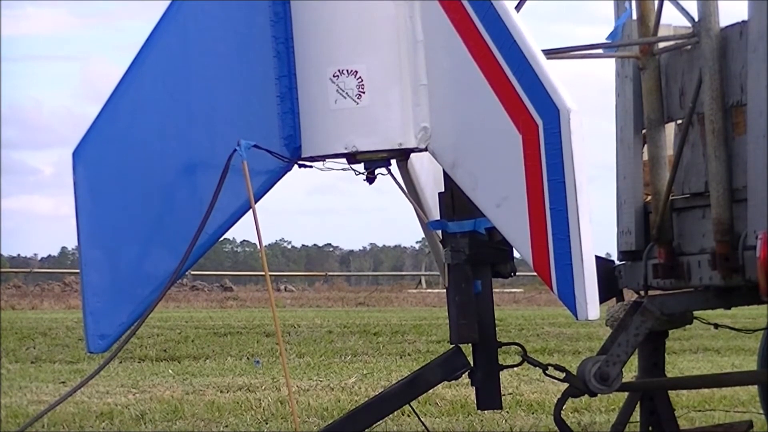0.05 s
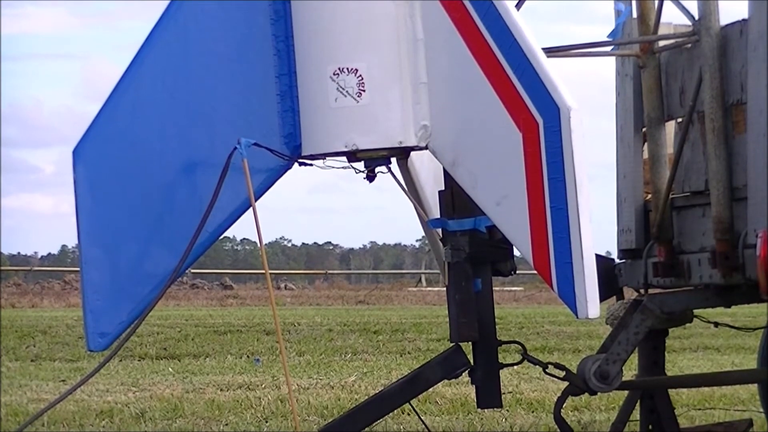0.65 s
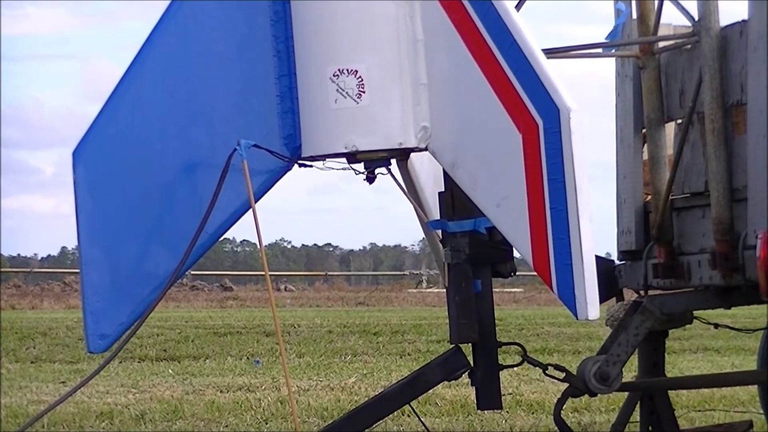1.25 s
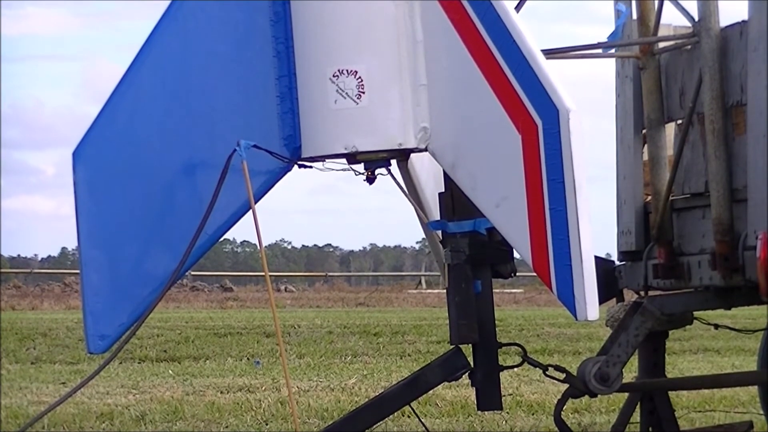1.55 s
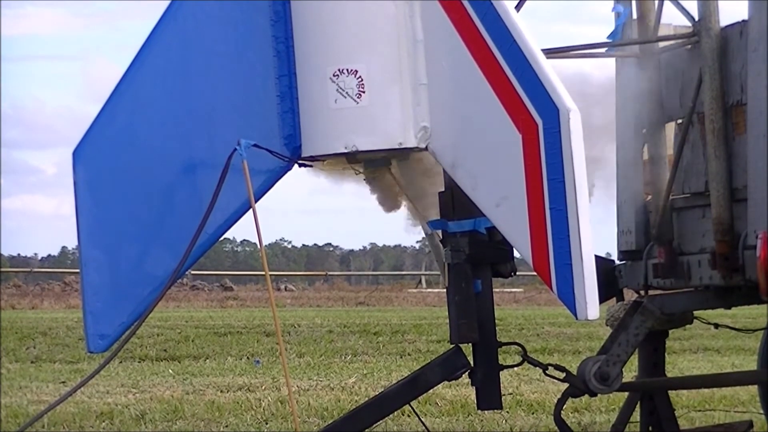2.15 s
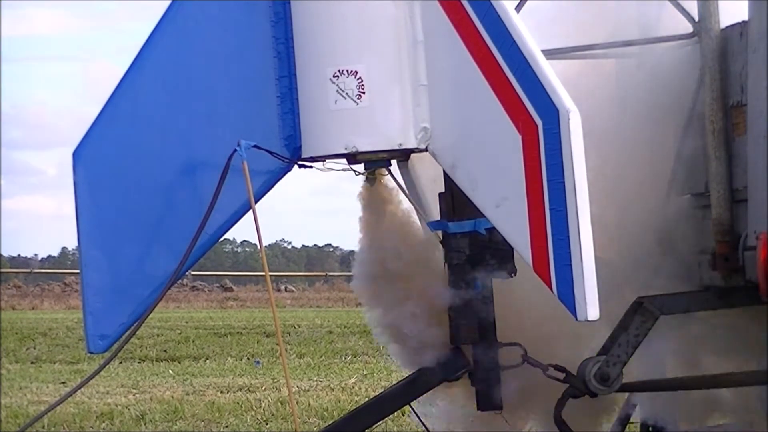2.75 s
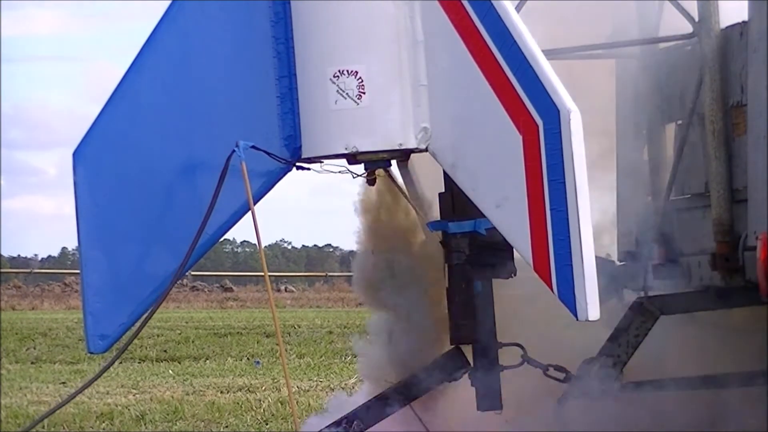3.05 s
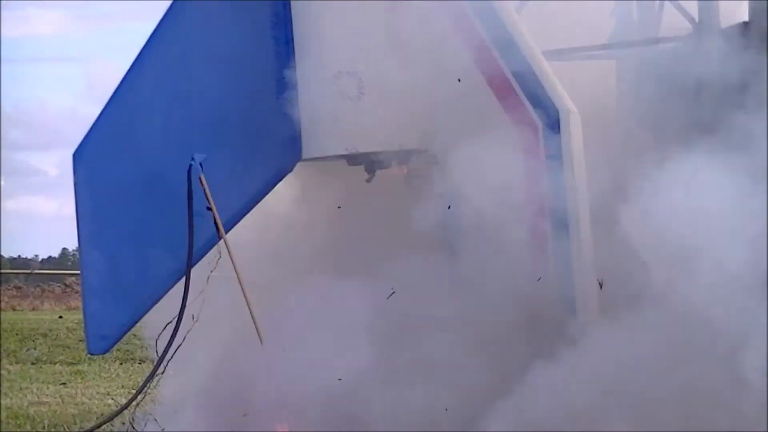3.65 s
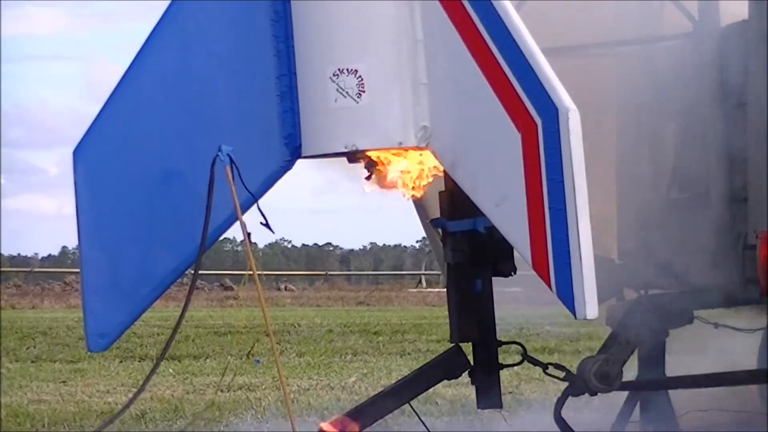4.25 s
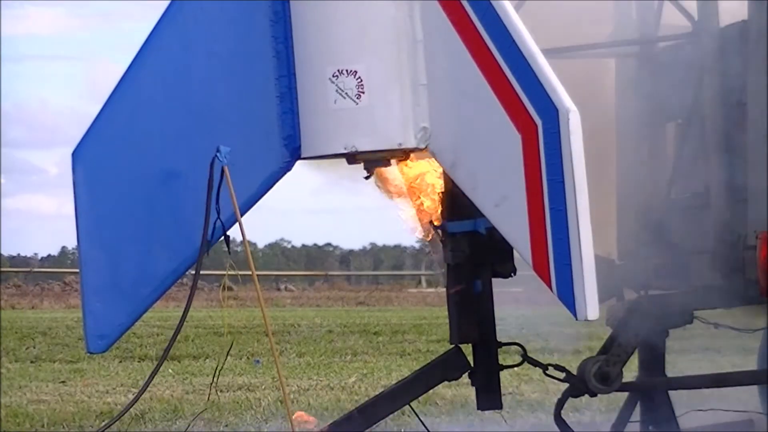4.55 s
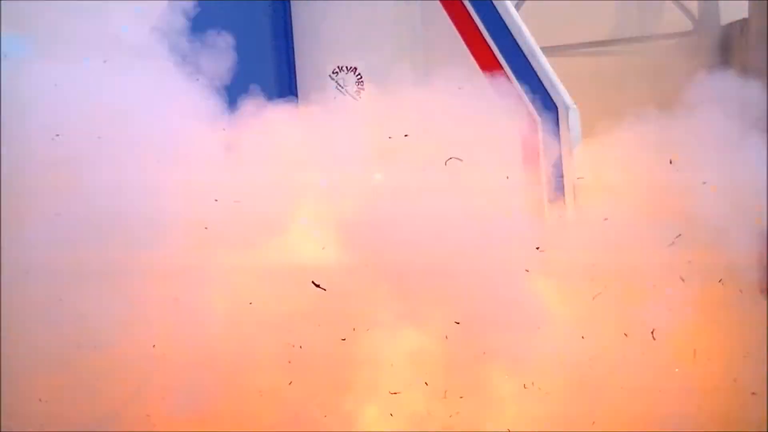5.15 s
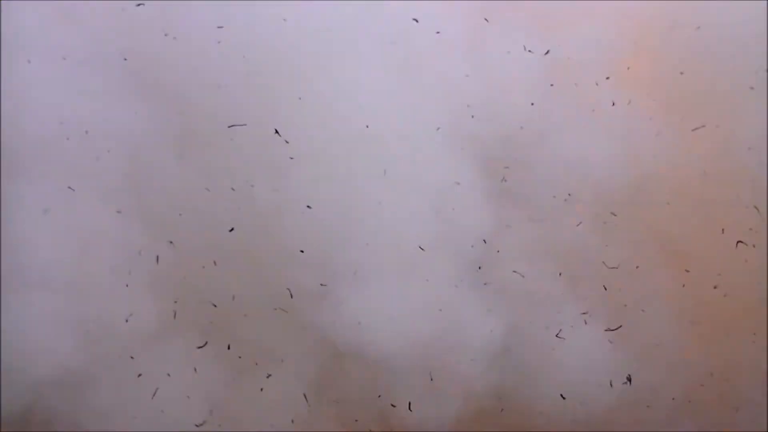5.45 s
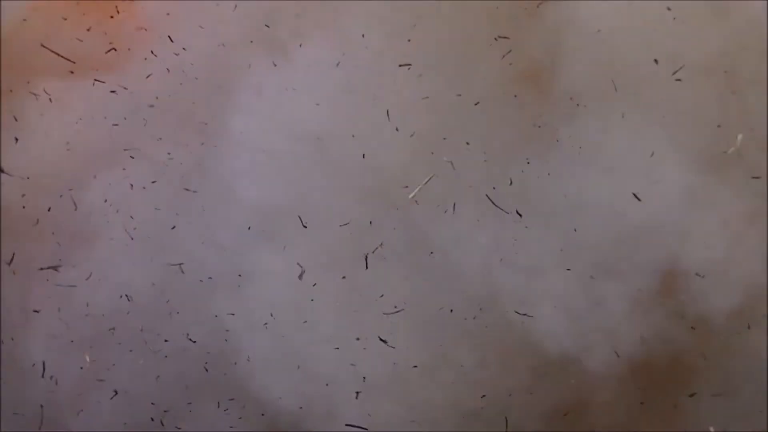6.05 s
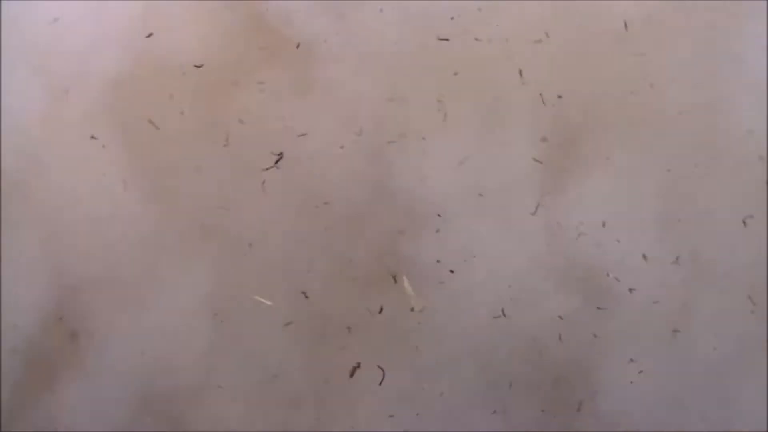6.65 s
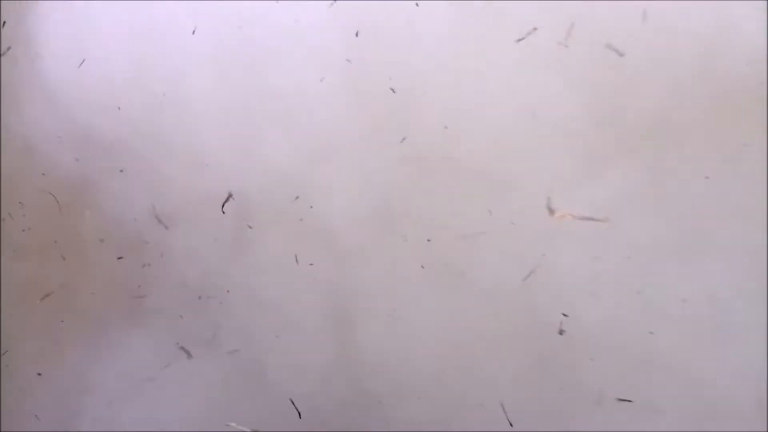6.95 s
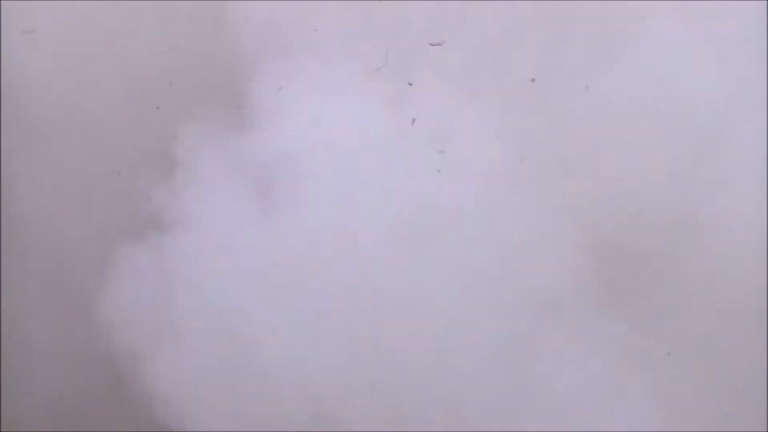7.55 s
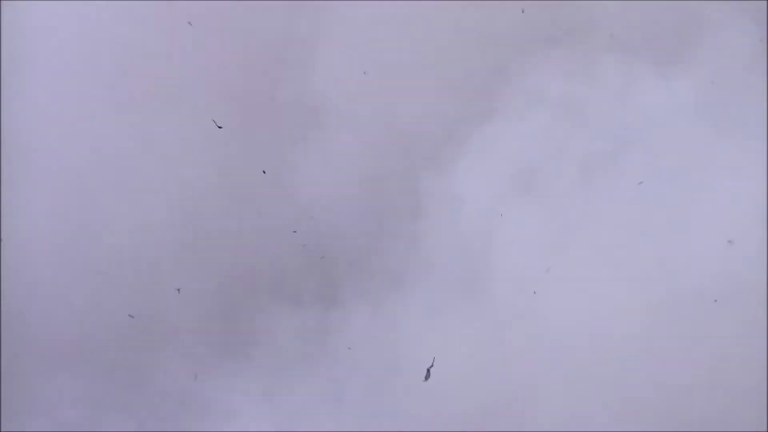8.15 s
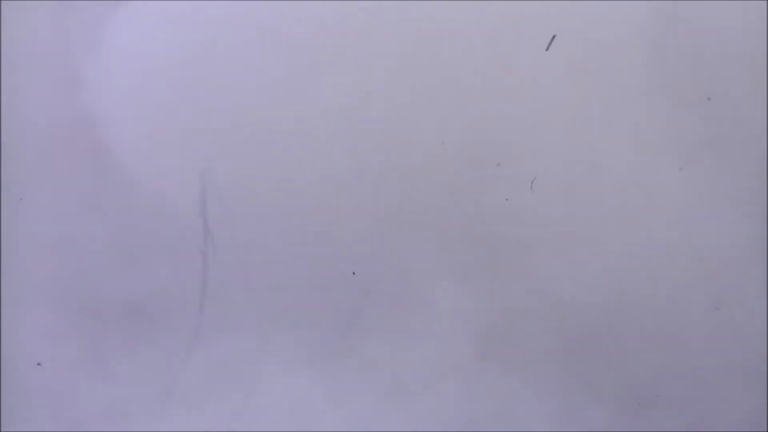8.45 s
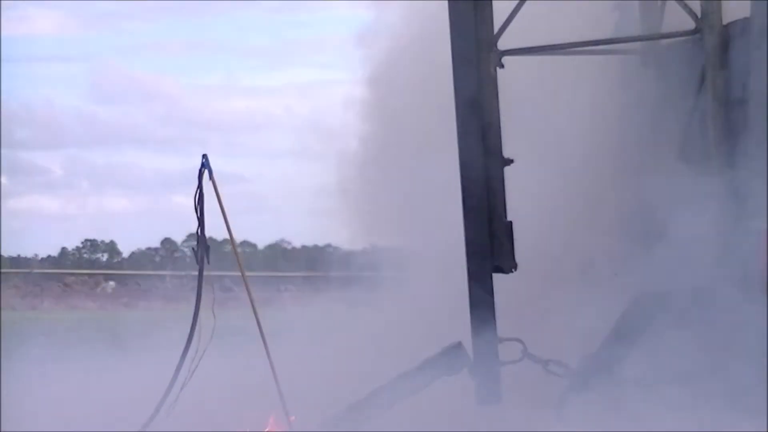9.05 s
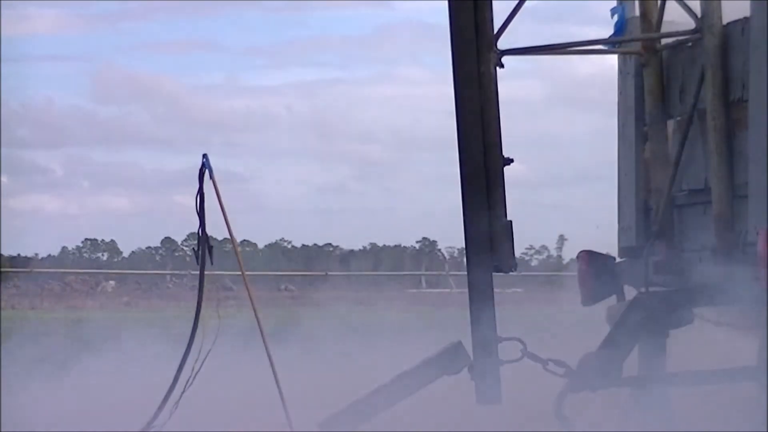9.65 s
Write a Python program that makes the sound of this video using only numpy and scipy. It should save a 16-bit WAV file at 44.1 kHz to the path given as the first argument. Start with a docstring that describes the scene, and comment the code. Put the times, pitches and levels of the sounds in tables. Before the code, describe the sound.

Close to a launch pad in an open field, gusty wind rumbles and thumps on the microphone through the first four seconds, with two very faint bird peeps. An igniter snaps sharply at 0.1 seconds and pops again at 1.2, followed by small ticks and soft spits of gas. From about 2.7 seconds the rocket motor hisses and sputters, with another snap at 3, building to a loud hissing chuff at 3.3 that leaves a brief metallic ring. It falls back to a quiet smoulder with a couple of puffs. Near 4.9 seconds the flame surges, and at 5.1 the motor catches with a loud roar, strongest and brightest around 6 to 6.5. From there the roar sinks in pitch and slowly weakens as the rocket climbs, with a hollow, phasing sweep, slightly to the right. Crackling grows from about 7.5 seconds and continues until the end, near 9.8.

```python
"""Lift-off of a solid-fuel rocket

Beside the pad in an open field, wind eddies buffet the microphone and a distant bird peeps.
The igniter pops; the motor spits, smoulders, hisses and chuffs, then catches and lifts off its rail.
Large eddies in the jet roar and fine turbulence hisses. As the rocket climbs, the roar sinks in pitch,
steepens into crackling shocks, and is comb-filtered by its echo from the ground."""
import sys
import numpy as np
from scipy import signal
from scipy.fft import rfft, irfft, next_fast_len
from scipy.io import wavfile
from scipy.ndimage import uniform_filter1d, minimum_filter1d

SR = 44100
rng = np.random.default_rng(int(sys.argv[2]) if len(sys.argv) > 2 else 0)


def store_pcm(level_fs):
    """Save levels as 16-bit WAV."""
    pcm = np.round(np.clip(level_fs, -1, 1) * 32767).astype(np.int16)
    wavfile.write(sys.argv[1], SR, np.atleast_2d(pcm).T)


N = 432621
T = np.arange(N) / SR
COARSE_T = T[::64]

# left-right coherence of the wind and of the jet: f/Hz, coherence
WIND_COHERENCE = [(60, 0.093), (300, 0.41)]
JET_COHERENCE = [(100, 0.98), (300, 0.92), (6500, 1)]
# attempts to light, as pressure builds and a flame billows out:
# t_full/s, t_end/s, roar level/dB, hiss level/dB, flame level/dB, f_eddy/Hz
ATTEMPTS = [(3.07, 3.27, -22.5, -26.5, -28.5, 2160), (4.92, 5.07, -20, -33.5, -19.5, 1600)]
CATCH_S, CATCH_DB_PER_S = 5.09, 648   # onset of the steady burn


def from_db(db):
    """Amplitude ratio of a level."""
    return 10 ** (np.asarray(db) / 20)


def rms_one(x):
    """Normalisation to unit rms."""
    return x / np.sqrt(np.mean(x ** 2) + 1e-20)


def at_hz(points, hz):
    """Interpolation of a spectrum on a log-frequency axis."""
    f, value = np.transpose(points)
    return np.interp(np.log(hz + 1e-9), np.log(f), value)


def band(x, low_hz, high_hz, order=2):
    """Causal band-pass filtering."""
    sos = signal.butter(order, [low_hz, min(high_hz, SR / 2 - 1)], "band", fs=SR, output="sos")
    return signal.sosfilt(sos, x + 1e-18)


def drift(rate_hz, t=T):
    """Slow random fluctuation: low-passed noise of unit rms."""
    r = np.exp(-2 * np.pi * rate_hz * COARSE_T[1])
    slow = signal.lfilter([1], [1, -2 * r, r * r], rng.standard_normal(2 * len(COARSE_T)))
    return np.interp(t, COARSE_T, rms_one(slow[len(COARSE_T):]))


def pan(left_db):
    """Channel gains for a left-right level difference."""
    return from_db(np.array([[.5], [-.5]]) * left_db)


def noise(spectrum, coherence):
    """Partially coherent stereo noise of a given spectral shape and unit rms."""
    size = next_fast_len(N)
    hz = np.arange(size // 2 + 1) * SR / size
    alike = np.clip(at_hz(coherence, hz), 0, 1)
    mid, side = rfft(rng.standard_normal((2, size))) * from_db(at_hz(spectrum, hz))
    channels = np.sqrt(1 + alike) * mid + np.sqrt(1 - alike) * side * [[1], [-1]]
    return rms_one(irfft(channels, size)[:, :N])


def ring(force, modes):
    """Forced response of damped modes (f/Hz, level/dB, t60/s)."""
    out = 0
    for hz, db, t60 in modes:
        r, w = from_db(-60 / (t60 * SR)), 2 * np.pi * hz / SR
        out += signal.lfilter([0, from_db(db) * np.sin(w)], [1, -2 * r * np.cos(w), r * r], force + 1e-18)
    return out


def bursts(rows, rise_s):
    """Envelope of exponentially decaying events (t/s, level/dB, t60/s)."""
    out = np.zeros(N)
    for s, db, t60 in rows:
        start = int(s * SR)
        age = T[:min(N - start, SR)]
        out[start:start + len(age)] += from_db(db - 60 * age / t60) * (1 - np.exp(-age / rise_s))
    return out


def clicks(rows):
    """One impulse for each row (t/s, level/dB)."""
    out = np.zeros(N)
    for s, db, *_ in rows:
        out[int(s * SR)] = from_db(db)
    return out


def swell(start, end, db, rise_db_per_s, fall_db_per_s, t=T):
    """Power that grows exponentially, holds from start to end, and decays."""
    level = db - rise_db_per_s * np.maximum(start - t, 0) - fall_db_per_s * np.maximum(t - end, 0)
    return from_db(np.maximum(level, -150)) ** 2


def field(level_db=-56):
    """Ambient noise: the steady floor of the open field."""
    # background spectrum: f/Hz, level/dB
    spectrum = [(25, -18), (140, 1.5), (500, -17.5), (3400, -14), (5000, -18.5), (15500, -23.5)]
    return from_db(level_db) * noise(spectrum, WIND_COHERENCE)


def wind(lumpy_db=4.5, surge_db=-2, tear_db=-14, tear_knee_db=-38):
    """Turbulent pressure: eddies break on the microphone; the strongest thump, surge and tear."""
    # spells of audible wind, ducked under the loud chuff and the lift-off: t_start/s, t_end/s, level/dB
    spells = [(0, 0.178, -31), (0.26, 0.648, -38), (0.85, 1.02, -37.5), (1.07, 2.812, -33),
              (2.824, 3.24, -30), (3.39, 4.01, -36.5), (4.06, 5.08, -44), (6.9, 9.8, -47.5)]
    # single hard buffets: t/s, level/dB
    buffets = [(0.041, -21.5), (0.068, -26), (0.295, -24.5), (0.365, -25), (0.615, -44), (0.845, -45),
               (0.993, -25), (1.064, -24.5), (1.096, -23), (1.216, -22), (1.255, -18), (1.311, -24.5),
               (1.442, -30), (1.478, -25), (1.522, -19.5), (1.745, -19), (1.772, -20), (1.801, -26),
               (1.858, -24), (1.948, -22), (2.015, -16.5), (2.07, -24.5), (2.203, -18.5), (2.301, -19.5),
               (2.445, -25), (2.534, -21.5), (2.649, -20.5), (2.83, -16), (2.889, -16.5), (3.04, -15),
               (3.205, -14), (3.382, -24.5), (3.69, -24), (4.487, -31.5)]
    # wind spectrum: f/Hz, level/dB
    spectrum = [(25, -35), (65, -27), (150, -1), (240, 3), (400, -2.5), (560, -8.5), (900, -35.5),
                (2000, -59.5)]
    envelope = np.sqrt(sum(swell(*spell, rise_db_per_s=279, fall_db_per_s=400) for spell in spells))
    surges = bursts([(s, db + surge_db, .06) for s, db in buffets], rise_s=0.0011)
    pressure = np.hypot(envelope * rms_one(from_db(lumpy_db * drift(40.6))), surges)
    thumps = band(ring(clicks(buffets), [(380, 10, 0.017)]), 333, 910)
    tearing = rms_one(band(noise([(500, 15.0), (1000, 3.5), (4000, -35.0)], WIND_COHERENCE), 575, 4000))
    tear_gain = from_db(tear_db) * pressure * np.minimum(pressure / from_db(tear_knee_db), 2)
    rumble = pressure * noise(spectrum, WIND_COHERENCE)
    return (rumble + tear_gain * tearing + thumps) * pan(left_db=-3)


def igniter(crack_db=-5, spray_db=-9, ring_db=-3):
    """Impulsive excitation: each snap cracks and sprays grit; the longer ones ring the casing."""
    # snaps of the igniter and sparks: t/s, level/dB, t60/s
    snaps = [(0.0973, 4, 0.0051), (1.1533, -4.5, 0.074), (1.265, -16, 0.022), (1.3545, -14.5, .006),
             (1.685, -16, 0.014), (1.985, -10.5, 0.007), (2.262, -17, 0.0092), (2.538, -19, 0.0067),
             (3.026, 0, 0.0053), (3.453, -6, 0.0069)]
    # modes of the motor casing: f/Hz, level/dB, t60/s
    casing_modes = [(1830, -16, 0.036), (2415, -2.5, 0.038), (6500, -8, 0.024), (7060, 2.5, 0.0089)]
    spray = bursts(snaps, rise_s=.0001) * rng.standard_normal(N)
    crack = band(from_db(crack_db) * clicks(snaps) + from_db(spray_db) * spray, 300, 3000, order=1)
    longest = max(t60 for _, _, t60 in snaps)
    blows = clicks([(s, db + 40 * np.log10(t60 / longest)) for s, db, t60 in snaps])
    return crack + from_db(ring_db) * ring(blows, casing_modes)


def bird(peep_hz=4100, peep_s=0.013):
    """Tone pulses: a distant bird peeps, each peep a sine under a Gaussian envelope."""
    # peeps: t/s, level/dB
    peeps = [(.48, -54), (2.08, -54)]
    envelope = sum(from_db(db) * np.exp(-((T - s) / peep_s) ** 2) for s, db in peeps)
    return envelope * np.sin(2 * np.pi * peep_hz * T)


def spits(t60=0.095):
    """Turbulent outflow: the motor spits soft puffs of hissing gas."""
    # puffs: t/s, level/dB
    puffs = [(1.493, -36.5), (1.624, -41.5), (2.003, -38), (2.357, -39), (2.492, -35), (3.976, -40),
             (4.283, -36)]
    gas = noise([(1000, -5), (2200, 0.5), (8000, -4.0), (14000, -26)], JET_COHERENCE)
    return bursts([(s, db, t60) for s, db in puffs], rise_s=0.0011) * gas


def smoulder():
    """Cavity resonance: the hollow motor sounds as it smoulders."""
    # spells of smouldering: t_peak/s, level/dB, rise/(dB/s), fall/(dB/s)
    spells = [(3.36, -40.5, 13.5, 18), (4.85, -51, 70, 85)]
    # modes of the cavity: f/Hz, level/dB, t60/s
    cavity_modes = [(970, -7, 0.07), (1590, 1.5, 0.02), (1907, 1.5, 0.022), (2330, 0.5, 0.016),
                    (2830, 0.5, 0.0074)]
    envelope = np.sqrt(sum(swell(s, s, db, rise, fall) for s, db, rise, fall in spells))
    fade_in = np.interp(T, [1.2, 2.2], [0, 1])
    return envelope * fade_in * rms_one(ring(rng.standard_normal(N), cavity_modes))


def climb(t, liftoff_s=5.261, to_45_deg_s=1.512):
    """Steadily growing thrust: height and distance (in pad distances), and elevation in degrees."""
    height = (np.maximum(t - liftoff_s, 0) / to_45_deg_s) ** 3
    return height, np.hypot(1, height), np.degrees(np.arctan(height))


def swerves(t):
    """Brief excursions: roar, hiss and pitch briefly rise or dip; close to the pad the jet wavers, and high in
    the climb the sound fades and swells on its way through the air."""
    # Gaussian excursions: t/s, half-length/s, roar level/dB, hiss level/dB, pitch shift/octaves
    excursions = [(5.497, 0.11, 1, -1, -0.037), (5.677, 0.065, 3, -1.5, 0.039),
                  (6.023, 0.02, -1, -1.5, -0.094), (6.103, 0.032, 0, 6, 0.037),
                  (6.177, 0.057, 2.5, 2.5, -0.14), (6.227, 0.013, -1, -2, 1.55),
                  (6.33, 0.025, 0.5, 4.5, -0.48), (6.382, 0.045, 0.5, 5.5, 0.48),
                  (9.008, 0.18, 0, -9.5, -0.32), (9.183, 0.028, -5.5, -2, -0.14), (9.367, 0.08, 2, 6, 0.29)]
    return sum(np.outer(change, np.exp(-((t - s) / half) ** 2)) for s, half, *change in excursions)


def jet_levels(t, cone_deg=47.3, cone_edge_deg=5.2, pad_clear_deg=2.8, fade_db_per_s=176):
    """Directivity and distance set the burn's roar and hiss (dB); outflows on the pad add in power."""
    # gas seeping before each attempt: t_start/s, t_end/s, roar level/dB, hiss level/dB
    leaks = [(2.75, 2.9, -39, -47), (4.62, 4.8, -44, -43)]
    # brief flares of the propellant: t_start/s, t_end/s, roar level/dB, hiss level/dB
    chuffs = [(2.93, 2.98, -26.5, -32), (3.095, 3.125, -20.5, -24.5), (3.155, 3.18, -18.5, -30),
              (3.243, 3.318, -19, -10), (5.075, 5.09, -12.5, -45)]
    _, distance, angle = climb(t)
    doublings = np.log2(distance)
    in_cone = .5 + .5 * np.tanh((angle - cone_deg) / (2 * cone_edge_deg))   # quieter from behind
    pad_muffle_db = 15 * np.exp(-angle / pad_clear_deg)
    roar_swerve, hiss_swerve, _ = swerves(t)
    roar = -4.5 - pad_muffle_db - 8 * in_cone - 1.63 * doublings + roar_swerve
    hiss = -10.5 - 12.5 * in_cone - 2.5 * doublings + hiss_swerve
    power = swell(CATCH_S, np.inf, np.array([roar, hiss]), CATCH_DB_PER_S, fade_db_per_s, t)
    for rows, *slopes_db_per_s in ((leaks, 33.5, 33.5), (ATTEMPTS, 77.5, fade_db_per_s), (chuffs, 525, 954)):
        for start, end, roar_db, hiss_db, *_ in rows:
            power += swell(start, end, np.array([[roar_db], [hiss_db]]), *slopes_db_per_s, t)
    return 10 * np.log10(power)


def eddy_hz(t, side_hz=2780, rear_hz=544, rear_deg=79.4):
    """Directivity of pitch: larger, deeper eddies are heard as the jet turns its back."""
    on_pad = np.interp(t, [ATTEMPTS[0][1], ATTEMPTS[1][0]], [row[-1] for row in ATTEMPTS])
    turned = np.minimum(climb(t)[2] / rear_deg, 1)
    burning = side_hz * (rear_hz / side_hz) ** turned * 2 ** swerves(t)[2]
    return np.where(t < CATCH_S, on_pad, burning)


def jet(hiss_gain_db=-1.0, wander_octaves=0.2, patchy_db=1.32, focus_db=4.5, focus_octaves=0.28):
    """Turbulent mixing: large eddies roar around a wandering peak; fine ones hiss, duller when weak."""
    # colouring of the roar at the microphone: f/Hz, level/dB
    roar_colour = [(70, -21), (170, -1), (265, -8.5), (370, 0.5), (800, 1.5), (2900, -1.5), (3800, -2),
                   (5200, -2.5), (12000, -17.5)]
    # hiss spectrum: f/Hz, level/dB
    hiss_spectrum = [(2000, -63), (3100, -1.5), (3900, -2.5), (4900, -3), (6300, 2.5), (8000, -2),
                     (10000, -5.5), (12500, -14), (15500, -19.5)]
    edges = np.geomspace(50, 16000, 29)
    centres = np.sqrt(edges[1:] * edges[:-1])[:, None]
    widths = np.diff(edges)[:, None]
    roar_db, hiss_db = jet_levels(COARSE_T)
    swirl = np.interp(COARSE_T, [6.5, 7.2], [1, .3])   # strongest while the plume is close
    peak_hz = eddy_hz(COARSE_T) * 2 ** (wander_octaves * swirl * drift(16.5, COARSE_T))
    octaves = np.log2(centres / peak_hz)
    knee = 0.87   # octaves over which a rise of 12 dB/octave turns into a fall of 10
    hump_db = -knee * (12 * np.logaddexp(0, -octaves / knee) + 10 * np.logaddexp(0, octaves / knee))
    crest_db = focus_db * swirl * np.exp(-(octaves / focus_octaves) ** 2)
    roar = from_db(hump_db + crest_db + at_hz(roar_colour, centres))
    dulling_db_per_octave = 0.095 * np.clip(-10 - hiss_db, 0, 22)
    treble_octaves = np.maximum(np.log2(centres / 5000), 0)
    hiss = from_db(at_hz(hiss_spectrum, centres) - dulling_db_per_octave * treble_octaves)
    roar, hiss = (shape ** 2 / np.sum(shape ** 2 * widths, axis=0) for shape in (roar, hiss))
    density = np.sqrt(roar * from_db(roar_db) ** 2 + hiss * from_db(hiss_db + hiss_gain_db) ** 2)
    white = [noise([(SR, 0)], JET_COHERENCE) for _ in range(2)]
    # the burn is uneven until it catches
    sputter_db = np.interp(COARSE_T, [5.0, 5.2], [1.6, .6]) * drift(24.5, COARSE_T)
    out = 0
    for k, band_density in enumerate(density):
        gain = band_density * from_db(sputter_db + patchy_db * drift(25.6, COARSE_T)) * np.sqrt(SR / 2)
        out += np.interp(T, COARSE_T, gain) * band(white[k % 2], edges[k], edges[k + 1])
    return out


def pad_colour(x):
    """Inverse-square fading: a peak and a hollow in the exhaust's treble vanish as the rocket leaves."""
    # peak and hollow near the pad: f/Hz, Q, level/dB
    features = [(2950, 4.3, 1.5), (3830, 4.1, -5)]
    near = 1 / climb(T)[1] ** 2
    for hz, q, db in features:
        x = x + near * (from_db(db) - 1) * signal.lfilter(*signal.iirpeak(hz, q, fs=SR), x)
    return x


def flame(flicker_db=2, rise_db_per_s=101, fall_db_per_s=300):
    """Combustion noise: the flame billows at each attempt, then burns on and fades with distance."""
    # flame spectrum: f/Hz, level/dB
    spectrum = [(80, -38), (200, -10), (450, 4.5), (600, 1), (800, -16), (1200, -20), (2500, -51)]
    billows = sum(swell(start, end, db, rise_db_per_s, fall_db_per_s) for start, end, *_, db, _ in ATTEMPTS)
    burn_db = -32.5 - 2 * np.log2(climb(T)[1])
    burn = swell(CATCH_S, np.inf, burn_db, CATCH_DB_PER_S, fall_db_per_s)
    envelope = np.sqrt(billows + burn) * from_db(flicker_db * drift(26))
    return envelope * noise(spectrum, JET_COHERENCE) * pan(left_db=-2.4)


def blast_plate(chuff_end_s=3.335, level_db=-33, t60=0.84):
    """Modal ringing: the steel blast plate sounds on after a chuff."""
    # modes of the plate: f/Hz, level/dB, t60/s
    plate_modes = [(1760, 9, 0.018), (3340, -2, 0.05), (4050, -1, 0.17), (4290, 2.5, 0.085),
                   (5600, 5, 0.01)]
    envelope = bursts([(chuff_end_s, level_db, t60)], rise_s=0.0035)
    return envelope * rms_one(ring(rng.standard_normal(N), plate_modes))


def echoes(x):
    """Comb filtering: reflections strengthen with elevation, and the comb sinks as their lags grow."""
    # paths by the ground, an edge of the pad (inverted) and the pad: t/s, lag/ms, relative amplitude
    ground = [(6.3, .75, .3), (6.7, 1.37, .62), (7.2, 1.67, .62), (7.6, 1.735, .55), (8.4, 1.745, .4),
              (9.8, 1.71, .4)]
    edge = [(6.6, 1.46, -0.38), (7.1, 1.7, -0.042), (8.4, 1.77, -0.13), (9.5, 1.83, -0.27)]
    pad = [(7.4, 2, 0.033), (8.5, 1.97, 0.23)]
    dulled = (x + uniform_filter1d(x, size=3)) / 2
    reflected = 0
    for path in (ground, edge, pad):
        s, lag_ms, strength = np.transpose(path)
        earlier = T - np.interp(T, s, lag_ms) / 1000
        delayed = np.array([np.interp(earlier, T, channel) for channel in dulled])
        reflected += np.interp(T, s, strength) * delayed
    height, distance, _ = climb(T)
    return height / distance * reflected


def air(x, cut_hz=10500, height_scale=12.5):
    """Atmospheric absorption: a long path takes away the top of the treble."""
    far = 1 - np.exp(-climb(T)[0] / height_scale)
    dulled = signal.sosfiltfilt(signal.butter(2, cut_hz, fs=SR, output="sos"), x)
    return x + far * (dulled - x)


def crackle(base_per_s=220, level_db=9, shock_db=16, tail_db=5, tail_t60=0.016):
    """Nonlinear steepening: the jet's waves become shocks, the strong ones with a ragged tail."""
    # strong shocks: t/s, level/dB
    shocks = [(7.945, -4.5), (8.119, -6), (8.462, -5), (8.564, -3), (9.332, -7.5), (9.466, -5.5),
              (9.569, -6), (9.628, -5.5)]
    born = rng.random(N) < base_per_s * np.interp(T, [6.8, 9.3], [0, 1]) * from_db(4 * drift(8)) / SR
    spread_db = 4.5 * np.minimum(rng.exponential(1, N), 3)
    hiss_db = np.interp(T, COARSE_T, jet_levels(COARSE_T)[1])
    sizes = from_db(level_db + .5 * hiss_db + spread_db)   # shocks fade half as fast as the hiss
    tails = bursts([(s, db + tail_db, tail_t60) for s, db in shocks], rise_s=0.0017)
    strong = from_db(shock_db) * clicks(shocks) + tails * rng.standard_normal(N)
    return band(born * sizes + strong, 470, 3740, order=3)


def scene(flight_db=-1.0):
    """Superposition: the exhaust and its echoes, a little to the right once aloft, over pad and field."""
    exhaust = pad_colour(jet()) + crackle()
    exhaust = air(exhaust + echoes(exhaust))
    aloft = np.interp(T, [6.4, 7.2], [0, 1])
    exhaust = exhaust * pan(left_db=-2.3 * aloft) * from_db(flight_db * aloft)
    return exhaust + flame() + smoulder() + blast_plate() + igniter() + spits() + wind() + field() + bird()


def record(dry, ceiling=1.384, low_cut_hz=65, high_cut_hz=15700):
    """Band limiting and saturation: the microphone thins the bass; peaks are limited, then clip."""
    thin = signal.sosfilt(signal.butter(2, low_cut_hz, "high", fs=SR, output="sos"), dry)
    allowed_gain = ceiling / np.maximum(np.abs(thin).max(axis=0), ceiling)
    limited = thin * uniform_filter1d(minimum_filter1d(allowed_gain, size=128), size=128)
    clipped = limited / (1 + limited ** 12) ** (1 / 12)
    return signal.sosfilt(signal.ellip(10, .1, 70, high_cut_hz, fs=SR, output="sos"), clipped)


dry = scene()
out = record(dry)
store_pcm(out)
```